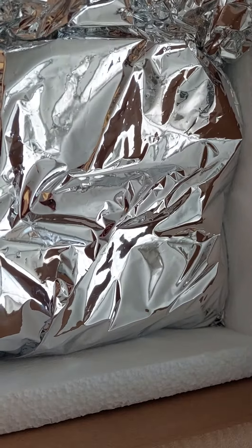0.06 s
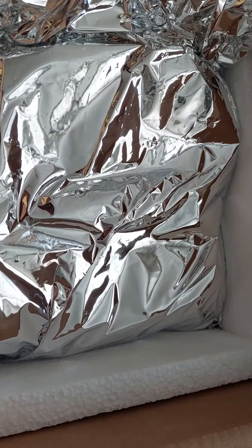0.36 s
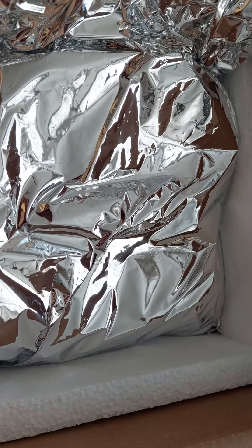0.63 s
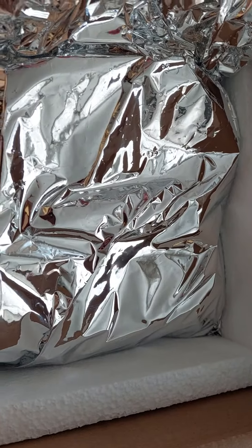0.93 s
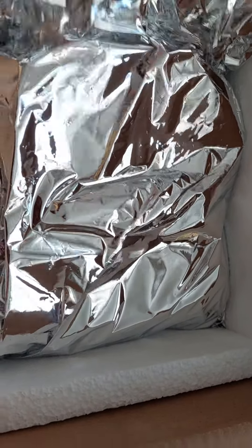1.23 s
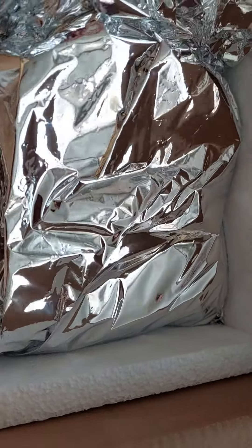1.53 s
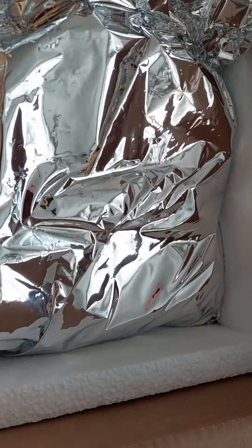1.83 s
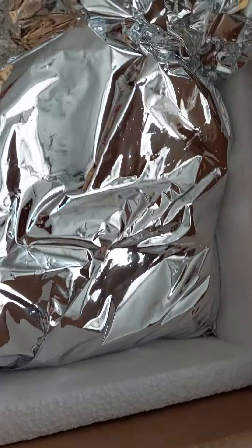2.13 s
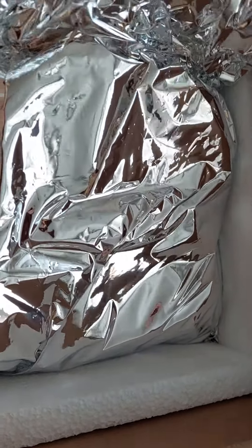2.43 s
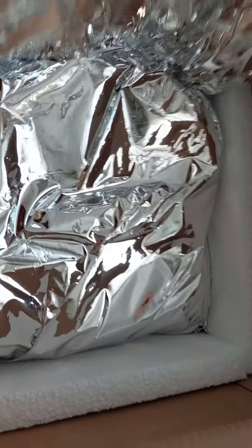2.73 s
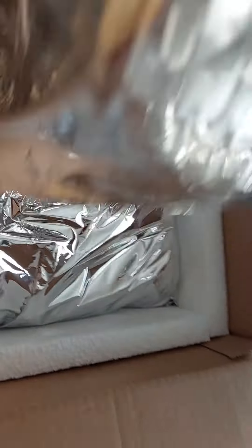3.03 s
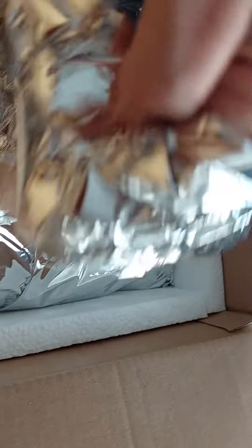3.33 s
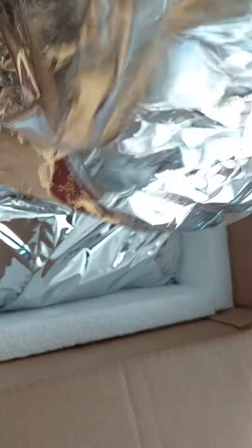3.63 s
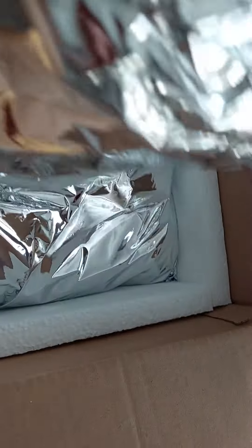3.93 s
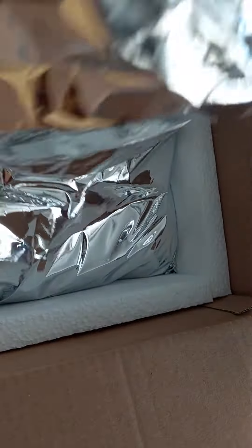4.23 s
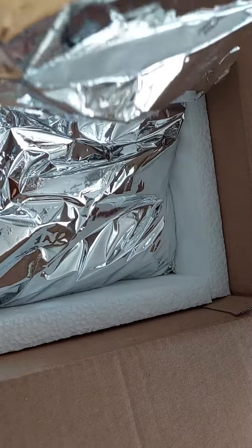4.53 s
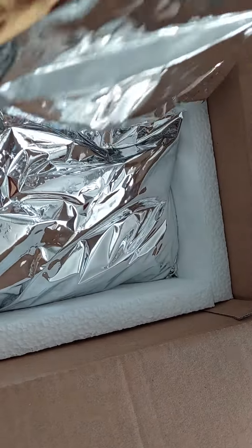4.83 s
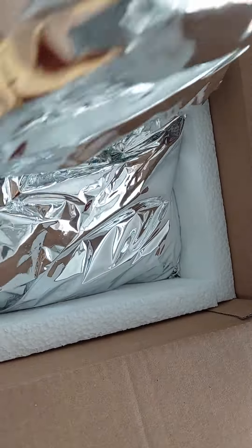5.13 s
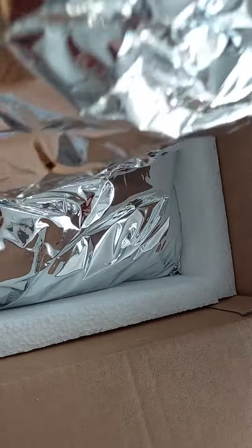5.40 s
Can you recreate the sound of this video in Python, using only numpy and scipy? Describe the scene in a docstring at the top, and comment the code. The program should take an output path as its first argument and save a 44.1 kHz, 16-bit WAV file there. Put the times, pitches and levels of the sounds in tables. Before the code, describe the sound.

A metallic foil liner is handled in a foam-lined box, close to the microphones in a small, quiet room. It opens with a faint crinkle and a few sharp snaps in the first 0.2 seconds, then drops to near silence with isolated ticks. At about 0.9 seconds the foil is pulled open: dense, bright crackling, loud snaps and a sliding hiss over a low flutter. The crinkling eases slightly from 1.5 to 2.4 seconds, then builds again and continues in irregular squeezes. From about 2.5 seconds the sheet is lifted and swings in soft, deep billows, the strongest near 3.1 seconds. Its wide panels flip with hollow pops, in a cluster around 3 seconds and again near 4.6, 4.8 and 5.3 seconds. Crackles and sharp snaps carry on until the end, at about 5.7 seconds.

```python
"""A faint crinkle and a few sharp snaps sound in a small, quiet room: a metallised foil liner is touched,
then pulled open inside a foam-lined box and lifted close to a pair of microphones. With each squeeze
of the hand its creases buckle in a swarm of tiny clicks and some loud snaps, and sheet slides over
sheet with a hiss. The wide panels between the creases flutter and flip with hollow pops, and the
whole sheet swings in soft billows."""
import sys
import numpy as np
from scipy import signal
from scipy.fft import rfft, irfft, next_fast_len
from scipy.io import wavfile
from scipy.ndimage import map_coordinates

SR = 44100
rng = np.random.default_rng(int(sys.argv[2]) if len(sys.argv) > 2 else 0)


def unload_wav(signal):
    """Save mono or channel-first audio to the path in sys.argv[1] as 16-bit WAV at rate SR, clipped to [-1, 1]."""
    wavfile.write(
        sys.argv[1],
        SR,
        np.round(np.clip(np.atleast_2d(signal).T, -1, 1) * 32767).astype(np.int16),
    )


N = 249606
MIC_LAG_S = .00032  # the sound reaches the right microphone this much later

# squeezes and tugs of the hand: (start [s], length [s], crinkle [dB], flexing [dB], brightness [dB])
HAND_SQUEEZES = [(0.07, 0.072, -46, -60, 0), (0.144, 0.062, -48.5, -45, -6),
                 (0.369, 0.071, -56.5, -55.5, -5), (0.731, 0.025, -57, -63, -11),
                 (0.93, 0.13, -28, -37.5, 2.5), (1.057, 0.13, -26, -38, -1.5), (1.235, 0.079, -24, -36, 0),
                 (1.342, 0.083, -29, -42, -1.5), (1.595, 0.077, -32.5, -43, 3),
                 (1.716, 0.092, -32, -42.5, -1.5), (1.925, 0.093, -35.5, -40.5, -2.5),
                 (2.247, 0.16, -35, -46, 0), (2.419, 0.044, -28.5, -50, 9.5), (2.547, 0.04, -30, -35, 4),
                 (2.699, 0.11, -36, -36, -5), (2.977, 0.14, -28, -34.5, -1), (3.259, 0.022, -28, -38.5, 0),
                 (3.335, 0.054, -30.5, -36.5, -2), (3.509, 0.04, -37.5, -50, 5),
                 (3.705, .155, -31, -36.5, 1), (3.912, 0.054, -30.5, -37.5, -0.5),
                 (4.02, 0.063, -29.5, -39.5, -2), (4.095, 0.038, -35.5, -32, -3),
                 (4.15, 0.11, -34, -38.5, -5), (4.262, 0.054, -33, -33, -6), (4.404, 0.088, -32, -37.5, -2),
                 (4.516, 0.034, -30.5, -47, -2), (4.701, 0.029, -31.5, -36.5, -2),
                 (4.8, 0.15, -29, -36.5, 0.5), (5.159, 0.14, -32.5, -36.5, -1.5),
                 (5.345, 0.034, -27.5, -32, -1), (5.465, 0.13, -34, -34, -0.5),
                 (5.616, .05, -25.5, -30.5, 1)]
# strain on the sheet between squeezes: (time [s], crinkle [dB], flexing [dB], brightness [dB])
SHEET_STRAIN = [(0, -55, -58.5, -4), (.26, -50.5, -57, -3), (.33, -66, -61, -7), (.49, -58.5, -67, -4),
                (.54, -86, -81, -2), (.65, -63.5, -78, 5), (.845, -81, -94, 5), (.87, -37.5, -49.5, -1),
                (1.53, -38.5, -47, 1.5), (2.2, -40.5, -45, -0.5), (2.5, -32, -41, -2),
                (2.9, -29.5, -35, -1), (3.2, -35, -40.5, 1), (3.595, -46.5, -54, -4),
                (3.63, -32.5, -40.5, -0.5), (4.63, -35.5, -41, 0), (5.02, -34, -36.5, 0.5),
                (5.07, -35, -36.5, -1.5), (5.66, -35.5, -49, -6.5)]
# rise of the sheet out of the box: (time [s], lift [0 inside, 1 outside])
SHEET_LIFT = [(2.7, 0), (3.1, 0.41), (3.7, 0.24), (5.3, 0.4)]
# side on which the sheet crinkles: (time [s], left minus right [dB])
CRINKLE_PAN = [(0.0, 3), (2.57, 3.5), (3.25, 2), (3.58, 4.5), (3.94, 2), (5.03, 3), (5.11, 1.5), (5.66, 2)]
# spectrum of the crinkle inside the box: (frequency [Hz], density [dB])
CRINKLE_INSIDE = [(300, -13.5), (750, -1.5), (1100, -4.5), (1600, -3), (2400, 2), (3200, -3), (4400, -1.5),
                  (6500, -5), (9000, -5.5), (12300, -1), (15500, -4.5), (17000, -18.5)]
# spectrum of the crinkle outside the box: (frequency [Hz], density [dB])
CRINKLE_OUTSIDE = [(300, -11), (750, -4.5), (1100, 3), (1600, 4), (2400, -5.5), (3200, -2.5), (4400, 0.5),
                   (6500, -3.5), (9000, -6), (12300, -2.5), (15500, -7.5), (17000, -22)]
# spectrum of the panels inside the box: (frequency [Hz], density [dB])
PANEL_INSIDE = [(18, -75), (30, -13), (60, 0), (123, -1), (157, 1.5), (273, -2.5), (338, -1.5), (398, -4.5),
                (630, -7), (1030, -10.5), (1500, -8.5), (1950, -46), (3300, -120)]
# spectrum of the panels outside the box: (frequency [Hz], density [dB])
PANEL_OUTSIDE = [(18, -62), (30, -9), (69, -16), (165, -12.5), (212, 3), (355, -1), (405, -1.5), (469, 1.5),
                 (571, -6.5), (680, 2.5), (1500, -12), (1950, -58), (3300, -120)]
# cavity resonances of the box: (frequency [Hz], bandwidth [Hz], gain [dB])
BOX_MODES = [(161, 9.8, -5), (226, 14, 1.5), (293, 31, -7.5), (353, 60, -7), (444, 39, -5)]
# spectrum of the still room: (frequency [Hz], density [dB])
AMBIENT_SPECTRUM = [(18, -67), (30, 1), (100, 20), (319, -33), (1040, -12), (1630, 9), (2980, -59),
                    (4650, -62), (9220, -42), (12000, -13), (16000, -5)]
# long creases that snap through:
# (time [s], level [dB], top octave [dB], facet pitch [Hz], left minus right [dB])
CREASE_SNAPS = [(0.0832, -29.5, -10, 6400, 5), (0.108, -33.5, -13, 3550, -2), (0.142, -31, -12, 6550, 10),
                (0.1703, -27, -11, 4200, -1), (0.3705, -44, -20, 1930, -2), (0.593, -45.5, 2, 4830, 7),
                (0.698, -47.5, -8, 4300, 1), (0.74, -36, -3, 4300, 4), (.764, -38, -17, 2150, 3),
                (.8435, -35.5, -8, 4530, -1), (0.8736, -29, -6, 1700, 4), (0.9011, -26.5, -8, 1610, 16),
                (.942, -22, -1, 7100, 12), (0.9647, -17.5, -10, 5300, 6), (1.1783, -36, 9, 2940, 5),
                (1.4726, -26.5, 10, 5820, 10), (1.5458, -26.5, -8, 4630, 8), (1.6363, -33, 14, 2240, 14),
                (1.843, -22.5, -12, 4900, 3), (1.9052, -23.5, -9, 4960, 9), (1.938, -23.5, -9, 2220, 5),
                (2.1322, -25.5, -10, 7100, 6), (2.4956, -20.5, -8, 5180, 4), (2.6363, -25, 13, 5100, 2),
                (2.668, -28, 6, 1700, 6), (2.8476, -19, -7, 5100, 3), (2.9137, -17.5, 12, 4900, -5),
                (2.9175, -21, 1, 4540, 13), (3.117, -17.5, -20, 2480, 5), (3.222, -25.5, -6, 1700, -2),
                (3.2698, -20, -12, 4630, 13), (3.3486, -22, -8, 2100, 9), (3.485, -23, -4.5, 6750, 7),
                (3.6592, -22.5, -1, 5760, 9), (3.3938, -22.5, -13, 2420, -3), (3.9348, -28.5, -9, 2190, -2),
                (4.098, -28, -7, 2420, -1), (4.165, -23, -2, 2000, 4), (4.1927, -21, -13, 4300, -2),
                (4.2365, -22, -10, 4530, -7), (4.2716, -24.5, -6, 4930, 11), (4.4441, -28, 12, 4280, -10),
                (4.6853, -21, -10, 2180, 15), (4.765, -23, -6, 7000, 8), (4.9626, -26, 14, 3200, 14),
                (5.253, -18.5, -8, 3930, 1), (5.301, -20.5, -4, 4400, 3), (5.326, -24.5, -19, 2600, -5),
                (5.364, -24, 0, 2500, 7)]
# spectrum of a single snap: (frequency [Hz], density [dB])
SNAP_SPECTRUM = [(300, -15), (1000, -12), (2200, -2), (4400, -6.5), (7000, -4.5), (9000, 0.5), (12500, 4.5),
                 (15500, 1.5), (17000, -16.5)]
# swings of the whole sheet: (time [s], level [dB])
SHEET_BILLOWS = [(2.469, -35), (2.639, -35), (2.751, -41), (3.121, -29.5), (3.37, -39), (3.809, -38),
                 (4.09, -34), (4.979, -34)]
# large panels that pop over: (time [s], level [dB], pitch [Hz])
PANEL_POPS = [(2.57, -31, 347), (2.718, -34, 320), (2.775, -35, 303), (2.983, -21.5, 380),
              (3.048, -27, 336), (3.059, -22, 295), (3.123, -21, 730), (3.143, -25, 446), (4.13, -30, 363),
              (4.552, -21.5, 360), (4.812, -28, 596), (4.8276, -20, 720), (4.842, -24, 470),
              (5.327, -22.5, 392)]
# reverberation of the room: (frequency [Hz], time to fall 60 dB [s])
ROOM_T60 = [(150, 0.23), (2000, 0.45), (6000, 0.067), (15000, 0.018)]
# likeness of the sound at the two microphones: (frequency [Hz], coherence [0-1])
MIC_COHERENCE = [(50, 0.63), (250, 1), (600, 1), (1200, 0.44), (2500, 0), (8000, 0)]
# balance of the two microphones: (frequency [Hz], left minus right [dB])
MIC_BALANCE = [(40, 11), (130, 2), (1000, -0.8), (2000, -4.5), (4000, -5), (8000, 3), (13000, 1)]


def amp(db):
    """Amplitude ratio of a level in decibels."""
    return 10 ** (np.asarray(db) / 20)


def unit(x):
    """Normalisation to rms 1."""
    return x / np.sqrt(np.mean(x ** 2) + 1e-20)


def along(points, hz):
    """Interpolation of (frequency, value) points on a logarithmic axis."""
    knots_hz, values = np.transpose(points)
    return np.interp(np.log(hz + 1), np.log(knots_hz + 1), values)


def curves(rows):
    """Linear interpolation in time: one value per sample for each column after the first."""
    times, *columns = np.transpose(rows)
    return [np.interp(np.arange(N) / SR, times, column) for column in columns]


def wobble(rate):
    """Smooth random modulation: a spline through rate knots a second."""
    return map_coordinates(rng.standard_normal(int(N * rate / SR) + 4), [np.arange(N) * rate / SR])


def filtered(x, response):
    """Linear filtering: the spectrum is multiplied by a frequency response."""
    size = next_fast_len(N + 8192)
    return irfft(rfft(x, size) * response(np.fft.rfftfreq(size, 1 / SR)), size)[..., :N]


def coloured(x, spectrum, size=4096):
    """Minimum-phase filtering: clicks take on a spectrum and keep their sharp front."""
    gain = amp(along(spectrum, np.fft.rfftfreq(size, 1 / SR)))
    cepstrum = irfft(np.log(gain + 1e-6))
    cepstrum[1:size // 2] *= 2
    cepstrum[size // 2 + 1:] = 0
    pulse = irfft(np.exp(rfft(cepstrum)))
    return signal.oaconvolve(x, pulse[None] / np.linalg.norm(pulse), axes=1)[:, :N]


def scatter(times, sounds):
    """Superposition of short sounds, one a row, at their start times."""
    at = np.round(np.maximum(times, 0) * SR).astype(int)[:, None] + np.arange(sounds.shape[1])
    return np.bincount(at.ravel(), sounds.ravel(), N)[:N]


def panned(pan_db):
    """Constant-power left and right gains for a level difference."""
    gains = amp(np.array([pan_db, -pan_db]) / 2)
    return gains / np.sqrt(np.mean(gains ** 2, axis=0))


def top_share(hz):
    """High-pass weighting that selects the top octave."""
    return 1 / (1 + (7300 / (hz + 1)) ** 6)


def lifted(x, inside, outside):
    """An enclosure colours a source: the spectrum shifts as the sheet rises from the box."""
    lift = np.clip(curves(SHEET_LIFT)[0], 0, 1)
    return (1 - lift) * unit(coloured(x, inside)) + lift * unit(coloured(x, outside))


def handling(attack_s=.013, release_s=.039):
    """Incoherent sources add in power: each squeeze rises, holds and decays on top of the strain."""
    start, length, db, flex_db, bright_db = np.transpose(HAND_SQUEEZES)
    strain_db, strain_flex_db, strain_bright_db = curves(SHEET_STRAIN)
    t = np.arange(N) / SR - start[:, None]
    grip = np.clip(t / attack_s, 0, 1)
    settling = np.exp(-np.clip((t - length[:, None]) / release_s, 0, 20))
    effort = (grip * settling) ** 2
    strain_power, squeeze_power = amp(strain_db) ** 2, amp(db) ** 2
    crinkling = strain_power + squeeze_power @ effort
    flexing = amp(strain_flex_db) ** 2 + amp(flex_db) ** 2 @ effort
    brightness = (strain_bright_db * strain_power + (bright_db * squeeze_power) @ effort) / crinkling
    return 10 * np.log10(crinkling), 10 * np.log10(flexing), brightness


def clicks(times, energy_db, top_db, facet_hz, pan_db, rise_s, facet_db=9, size=320):
    """Buckling frees elastic energy: a crack and a short rattle, coloured by the facet's resonance."""
    t, hz = np.arange(size) / SR, np.fft.rfftfreq(size, 1 / SR)
    envelope = (1 - np.exp(-t / rise_s)) ** 2 * (np.exp(-t / .0006) + .05 * np.exp(-t / .003))
    burst = np.roll(rng.standard_normal((len(times), 2, size)) * envelope, size // 32, axis=-1)
    octaves_off = np.log2((hz + 1) / facet_hz[:, None])
    resonance = np.exp(-(octaves_off / .2) ** 2)
    colour = amp(facet_db * resonance + top_db[:, None] * top_share(hz))
    burst = irfft(rfft(burst) * colour[:, None])
    burst /= np.linalg.norm(burst, axis=-1, keepdims=True)
    left, right = np.moveaxis(burst, 1, 0) * (amp(energy_db) * panned(pan_db))[..., None]
    extra_lag = MIC_LAG_S * rng.standard_normal(len(times)) / 2  # each crease has its own direction
    return np.array([scatter(times, left), scatter(times + extra_lag, right)])


def crinkle(crinkle_db, bright_db, slide_db=-5.5, gain_db=.5, count=5200):
    """Random buckling gives clumps of clicks and sliding friction a hiss; both grow with handling."""
    when, chance = rng.random((2, count))
    top, pitch, pan = rng.standard_normal((count, 3)).T
    size_db = 5.5 * np.minimum(-np.log(chance), 2.4)  # many small creases, few large ones
    grains = clicks(when * N / SR, size_db, 4 * top, 3600 * 2 ** (.7 * pitch), 5 * pan, rise_s=.0009)
    hiss = amp(slide_db) * rng.standard_normal((2, N))
    sheet = lifted(unit(grains) + hiss, CRINKLE_INSIDE, CRINKLE_OUTSIDE)
    treble = filtered(sheet, top_share)
    sheet = unit((sheet - treble) * amp(-bright_db / 2) + treble * amp(bright_db / 2))
    clumps_db = 1.1 * wobble(rate=55)
    return sheet * amp(crinkle_db + gain_db + clumps_db) * panned(curves(CRINKLE_PAN)[0])


def flaps(times, db, hz, cycles, size=900):
    """A flipped panel is a damped oscillator: its swing falls to 1/e in the given cycles."""
    phase = np.arange(size) / SR * hz[:, None]
    return scatter(times, amp(db)[:, None] * np.sin(2 * np.pi * phase) * np.exp(-phase / cycles))


def panels(flex_db, spread_db=1.5, count=2200):
    """Wide facets flutter all the time and excite the cavity resonances of the box."""
    def flutter():
        when, chance, pitch = rng.random((count, 3)).T
        hz = 70 * 2 ** (4.6 * pitch)
        size_db = spread_db * np.minimum(-np.log(chance), 3) + 20 * np.log10(hz)  # equal energy per Hz
        return unit(flaps(when * N / SR, size_db, hz, cycles=.99))

    def cavity(hz):
        return 1 + sum(amp(db) * 1j * hz * width / (mode_hz ** 2 - hz ** 2 + 1j * hz * width)
                       for mode_hz, width, db in BOX_MODES)

    body = filtered(np.array([flutter(), flutter()]), cavity)
    return lifted(body, PANEL_INSIDE, PANEL_OUTSIDE) * amp(flex_db)


def still_room(level_db=-66):
    """Stationary noise: the faint rumble and hiss of the room."""
    return amp(level_db) * unit(coloured(rng.standard_normal((2, N)), AMBIENT_SPECTRUM))


def cracks(times, db, top_db, facet_hz, pan_db):
    """Snap-through: a crease jumps to another stable shape and radiates a steep-fronted pulse."""
    pulses = clicks(times - .0003, db + 22.5, np.clip(top_db, -14, 12), facet_hz, pan_db, rise_s=.0002)
    return coloured(pulses, SNAP_SPECTRUM)


def ticks(crinkle_db, above_db=1, spread_db=1, top_db=-2, count=70):
    """Shorter creases snap through at random, as loudly as the sheet is being worked."""
    at = ((np.arange(count) + rng.random(count)) * (N - 1) / count).astype(int)
    size, top, pitch, pan = np.clip(rng.standard_normal((count, 4)), -2, 2).T
    db = crinkle_db[at] + above_db + spread_db * size
    pan_db = curves(CRINKLE_PAN)[0][at] + 5 * pan
    return cracks(at / SR, db, top_db + 7 * top, 3400 * 2 ** (pitch / 2), pan_db)


def snaps():
    """Elastic instability: the long creases snap through one by one."""
    return cracks(*np.transpose(CREASE_SNAPS))


def billows(centre_hz=97, spread_octaves=.25):
    """The loose sheet swings as a whole and displaces air: a soft, deep puff."""
    times, db = np.transpose(SHEET_BILLOWS)
    hz = centre_hz * 2 ** (spread_octaves * rng.standard_normal(len(times)))
    return flaps(times, db, hz, cycles=1.8, size=6000)


def pops(gain_db=3, slap_db=-6, slap_band_hz=(480, 1500), slap_t60=.044, ring_t60=.017, size=1400):
    """Impulsive excitation: the largest panels flip with a hollow knock and a dull slap of noise."""
    times, db, hz = np.transpose(PANEL_POPS)
    fade = amp(db[:, None] + slap_db - 60 * np.arange(size) / SR / slap_t60)
    band = signal.butter(2, slap_band_hz, "bandpass", fs=SR, output="sos")
    noise = signal.sosfilt(band, rng.standard_normal((2, *fade.shape)))
    slaps = np.array([scatter(times, fade * unit(side)) for side in noise])
    # all panels die away equally fast, so the small stiff ones swing more often
    knocks = flaps(times, db, hz, cycles=hz[:, None] * ring_t60 / np.log(1000))
    return amp(gain_db) * (knocks + slaps)


def reflections(x, early_db=-12, room_db=-13, count=8):
    """Early reflections return from box and table within milliseconds; the room reverberates briefly."""
    hz, t, noise = signal.stft(rng.standard_normal((2, SR // 2)), SR, nperseg=256)
    decay = amp(-60 * t / along(ROOM_T60, hz)[:, None])
    tail = signal.istft(noise * decay, SR, nperseg=256)[1]
    response = amp(room_db) * tail / np.linalg.norm(tail[0])
    for side in response:
        at = rng.integers(0, SR // 100, count)
        side[at] += amp(early_db) * rng.standard_normal(count) / np.sqrt(count)
    delayed = np.pad(response, ((0, 0), (SR // 200, 0)))
    return signal.fftconvolve(x, delayed, axes=1)[:, :N]


def at_microphones(pair):
    """Spaced receivers share the long waves; the path difference delays the right one."""
    def angle(hz):
        return np.arcsin(np.clip(along(MIC_COHERENCE, hz), 0, 1)) / 2

    own = filtered(pair, lambda hz: np.cos(angle(hz)))
    shared = filtered(pair[::-1], lambda hz: np.sin(angle(hz)))
    return filtered(own + shared, lambda hz: np.exp(-2j * np.pi * hz * [[0], [MIC_LAG_S]]))


def scene():
    """Superposition: the creases and panels, driven by one hand, add to the sound of the room."""
    crinkle_db, flex_db, bright_db = handling()
    creases = crinkle(crinkle_db, bright_db) + ticks(crinkle_db) + snaps()
    foil = creases + panels(flex_db) + pops() + billows()
    return at_microphones(foil + reflections(foil) + still_room())


def record(dry, low_cut_hz=35, top_hz=16000):
    """Band-limited transducers: each microphone has its own colour and sheds deep bass and top treble."""
    def response(hz):
        high_pass = (1j * hz / (low_cut_hz + 1j * hz)) ** 2
        return panned(along(MIC_BALANCE, hz)) * high_pass * (hz < top_hz)

    return filtered(dry, response)


dry = scene()
out = record(dry)
unload_wav(out)
```